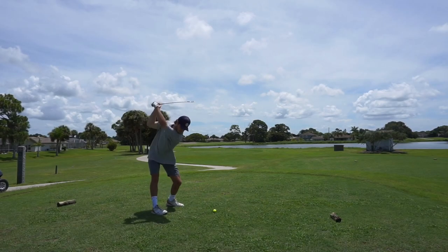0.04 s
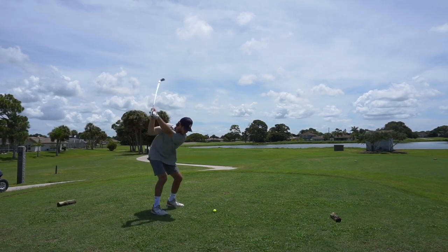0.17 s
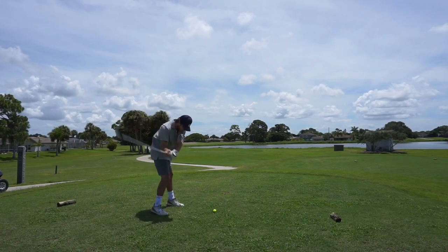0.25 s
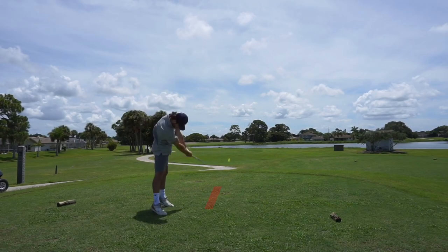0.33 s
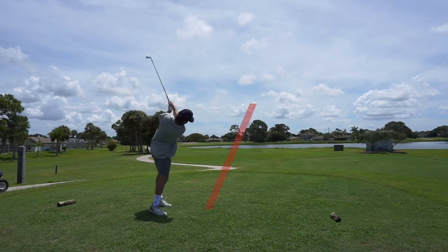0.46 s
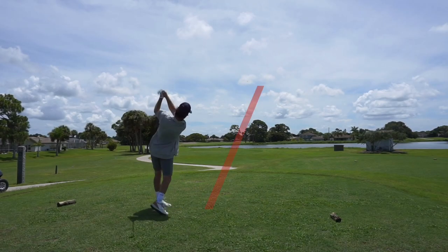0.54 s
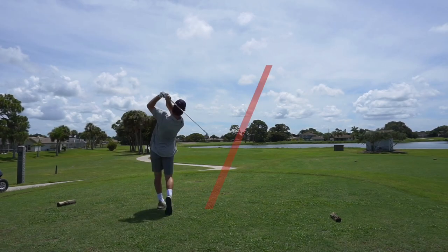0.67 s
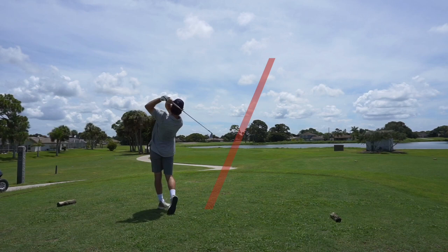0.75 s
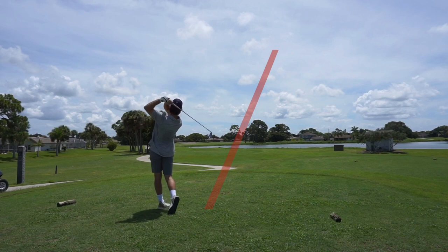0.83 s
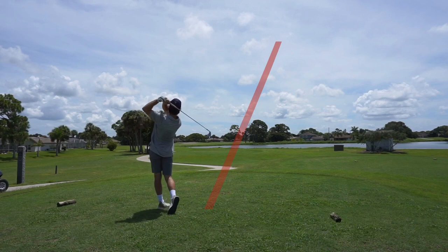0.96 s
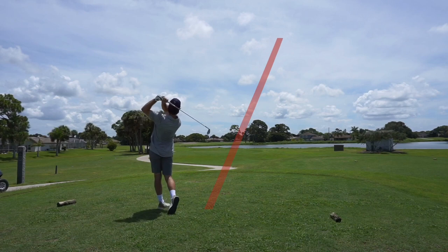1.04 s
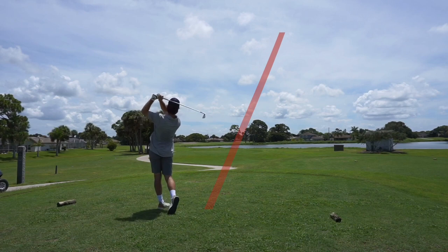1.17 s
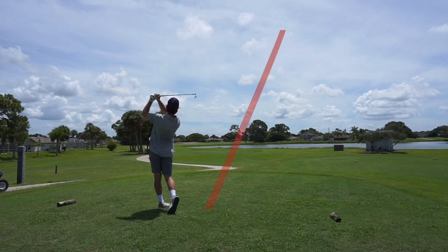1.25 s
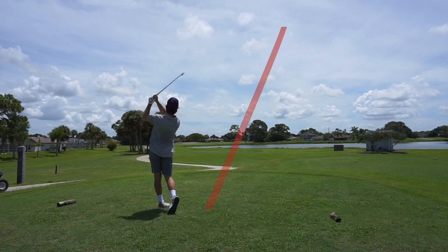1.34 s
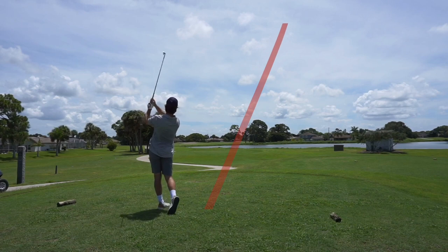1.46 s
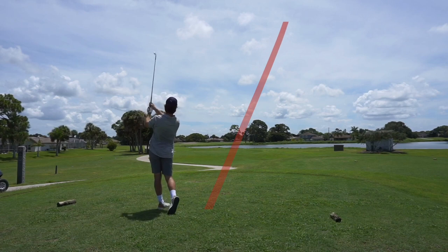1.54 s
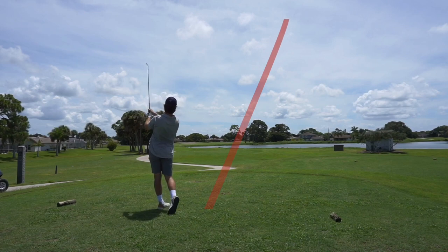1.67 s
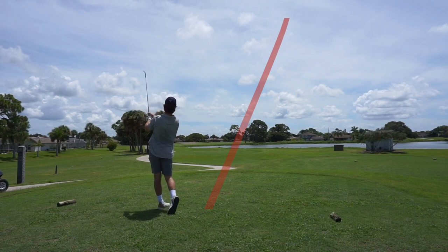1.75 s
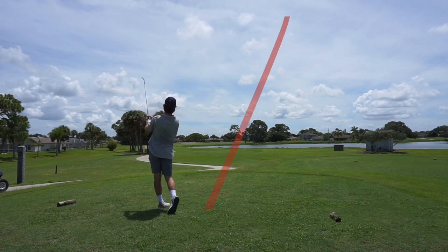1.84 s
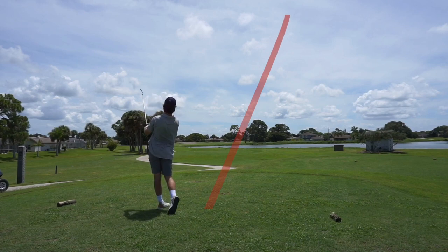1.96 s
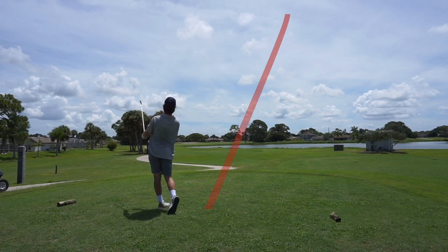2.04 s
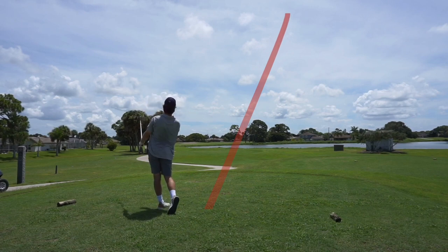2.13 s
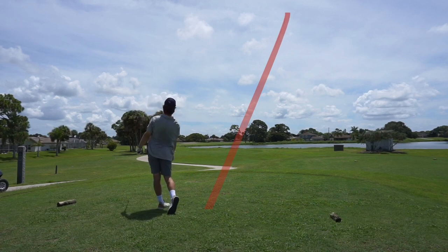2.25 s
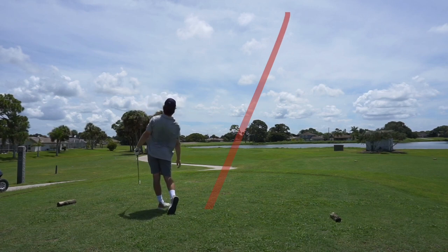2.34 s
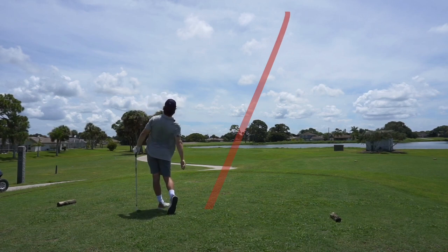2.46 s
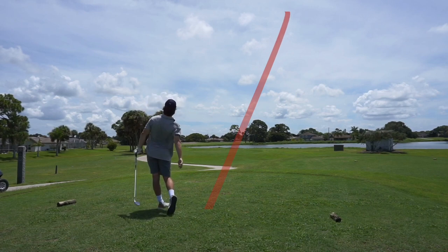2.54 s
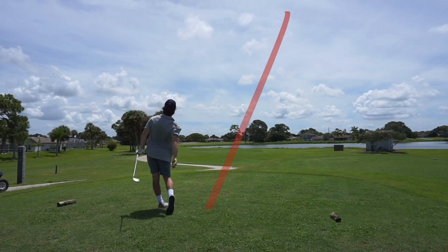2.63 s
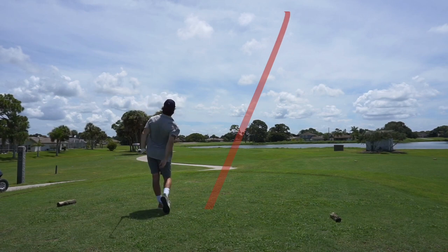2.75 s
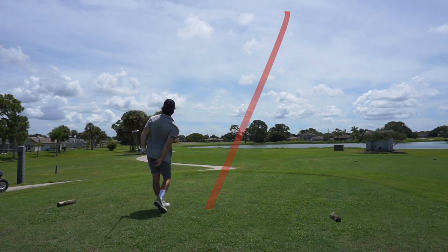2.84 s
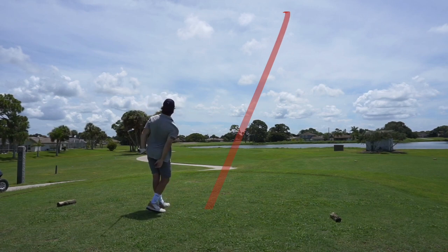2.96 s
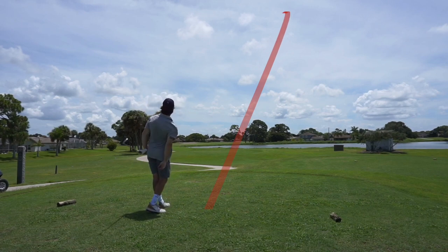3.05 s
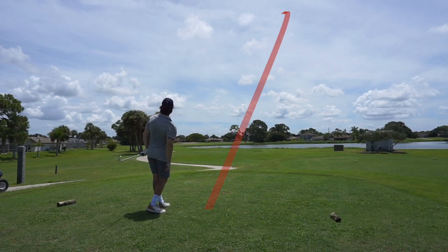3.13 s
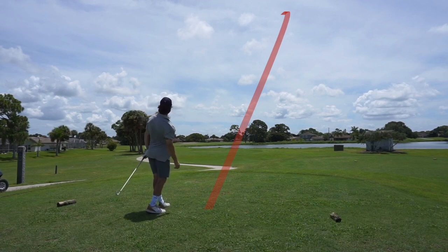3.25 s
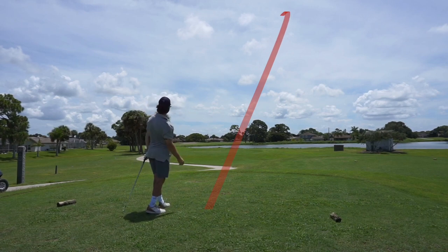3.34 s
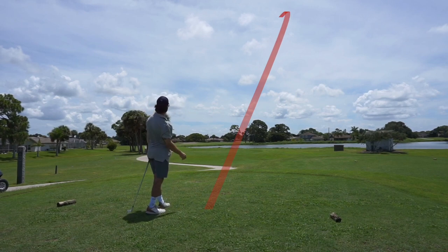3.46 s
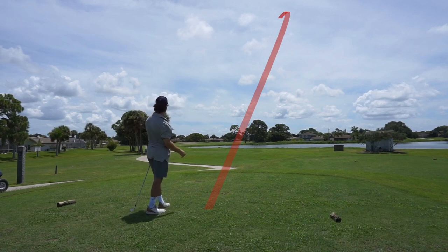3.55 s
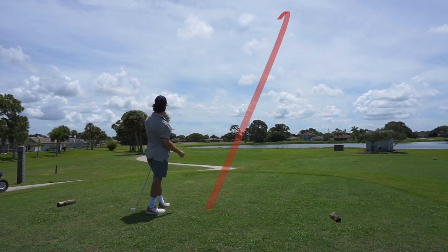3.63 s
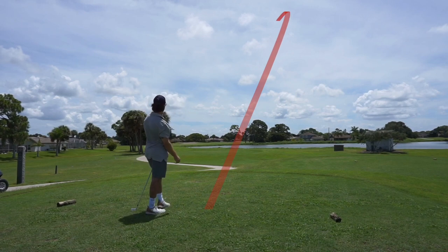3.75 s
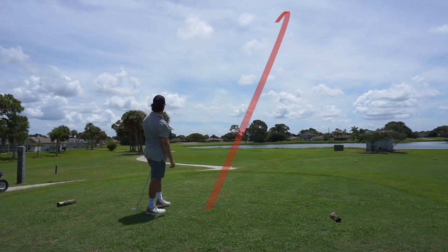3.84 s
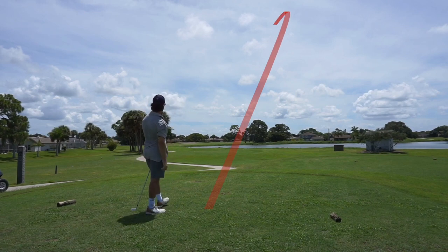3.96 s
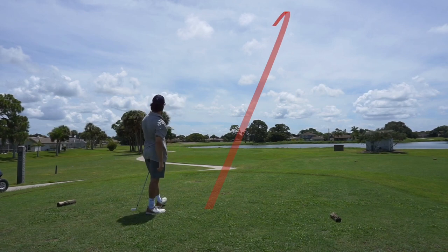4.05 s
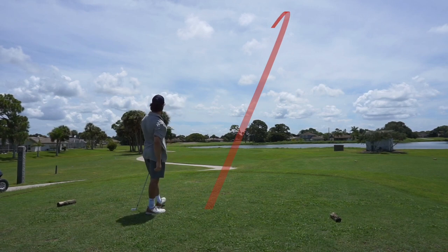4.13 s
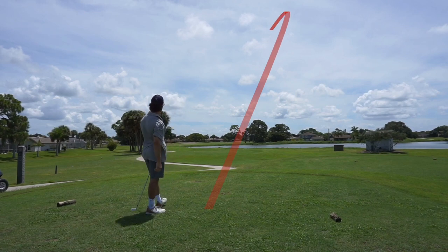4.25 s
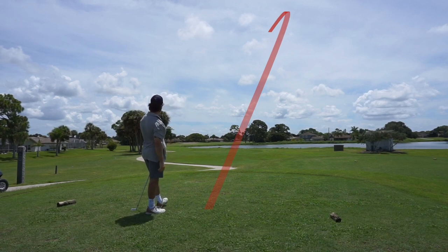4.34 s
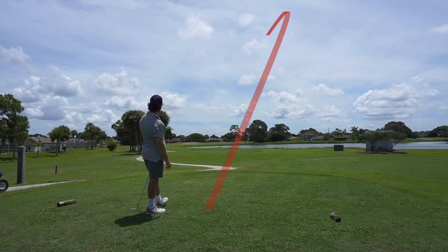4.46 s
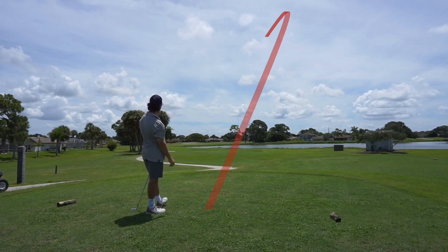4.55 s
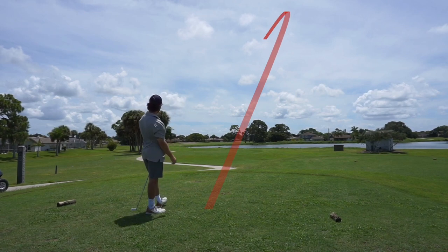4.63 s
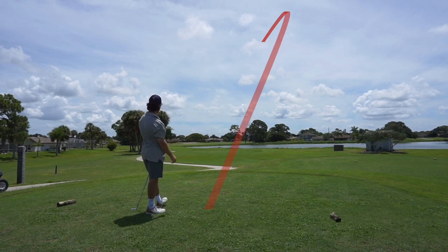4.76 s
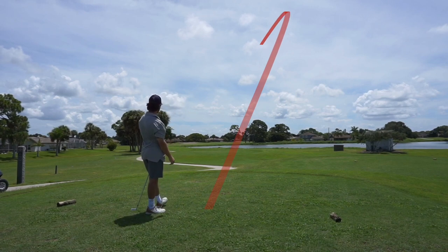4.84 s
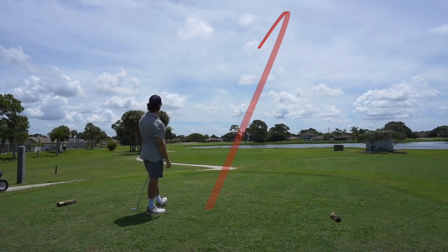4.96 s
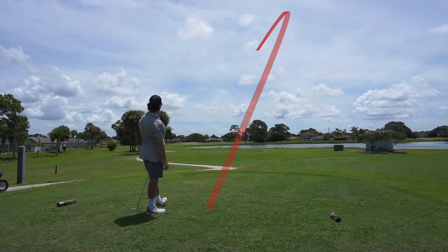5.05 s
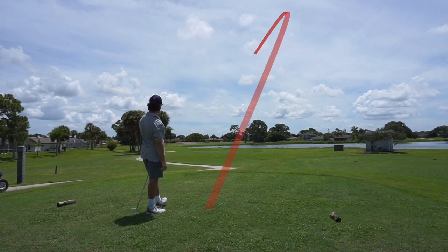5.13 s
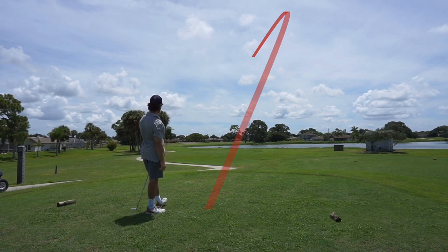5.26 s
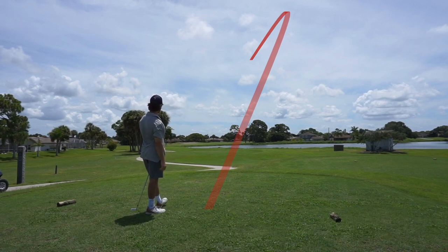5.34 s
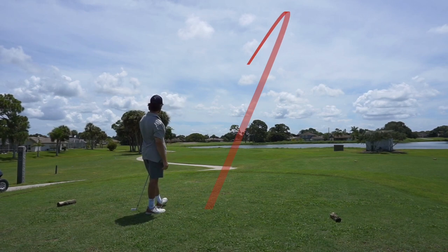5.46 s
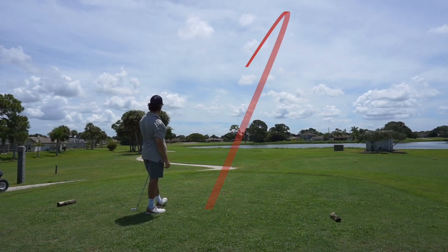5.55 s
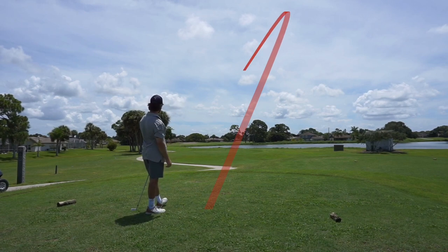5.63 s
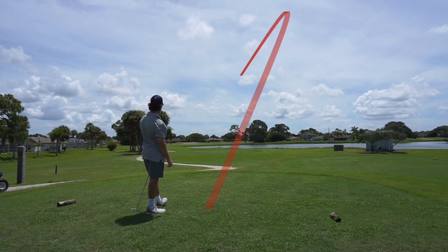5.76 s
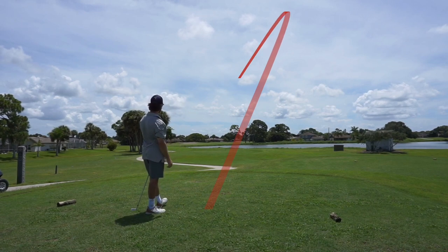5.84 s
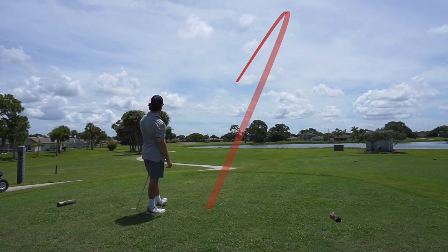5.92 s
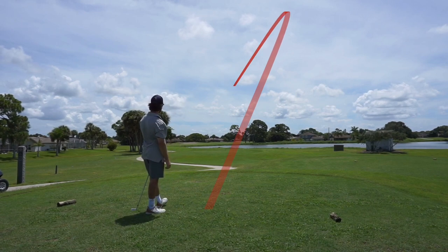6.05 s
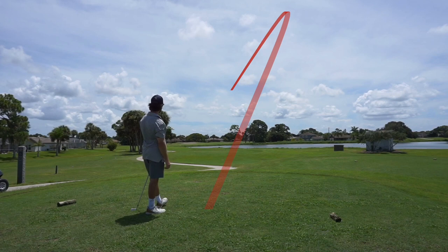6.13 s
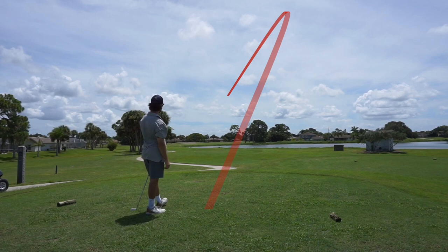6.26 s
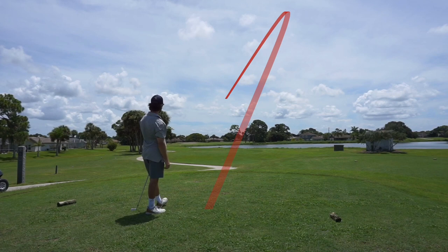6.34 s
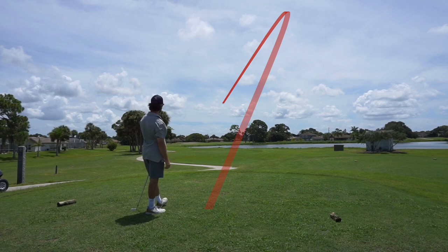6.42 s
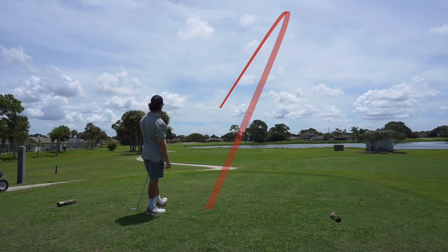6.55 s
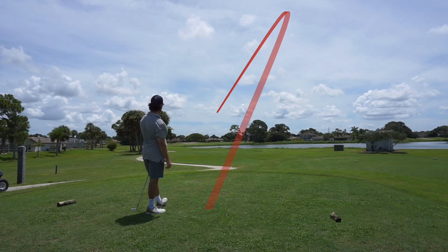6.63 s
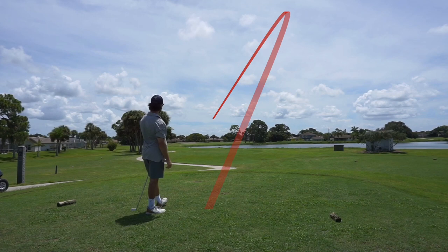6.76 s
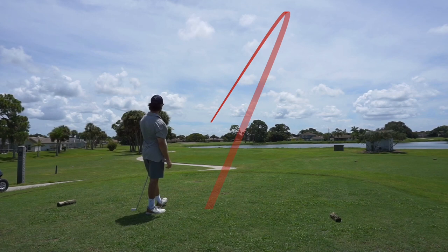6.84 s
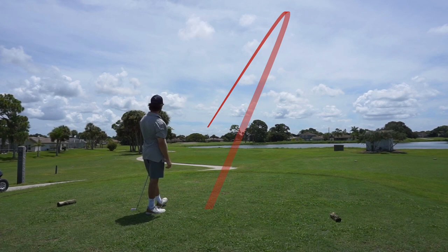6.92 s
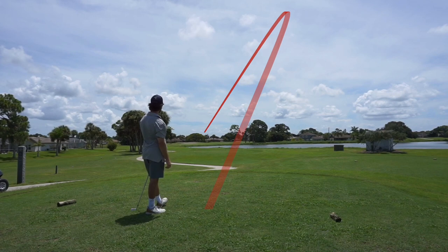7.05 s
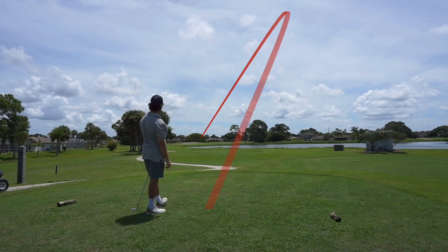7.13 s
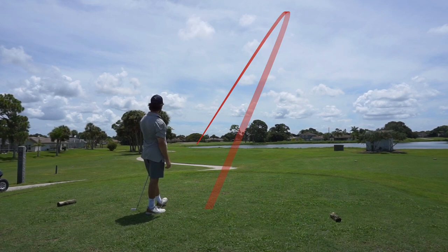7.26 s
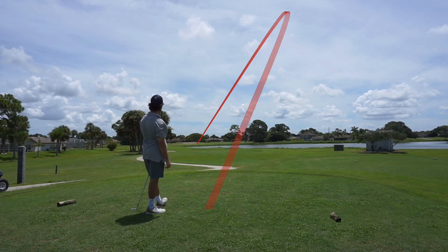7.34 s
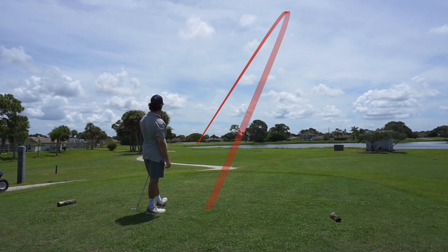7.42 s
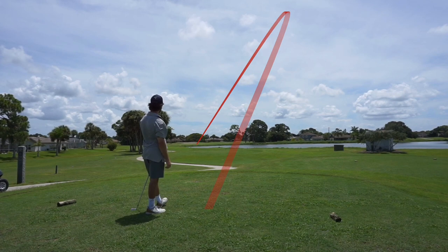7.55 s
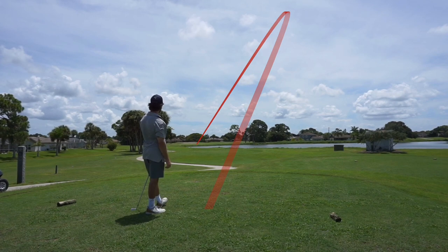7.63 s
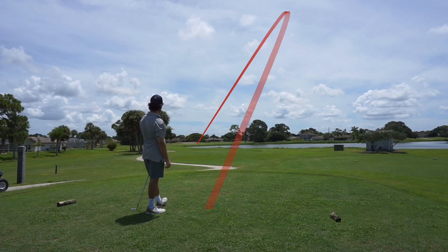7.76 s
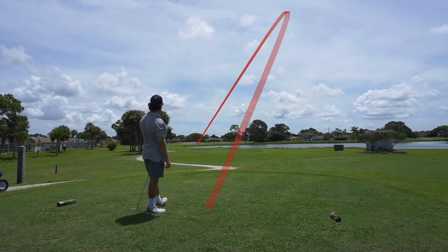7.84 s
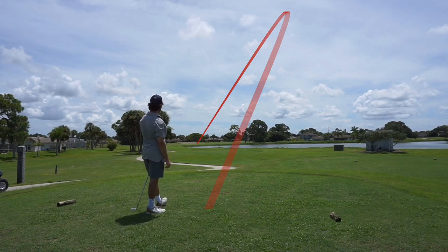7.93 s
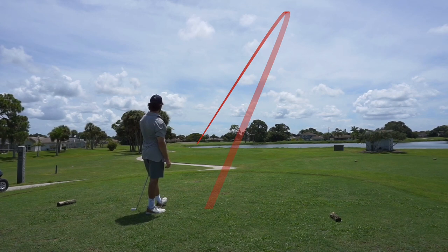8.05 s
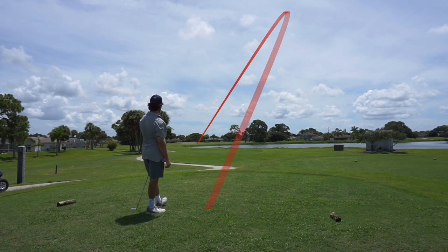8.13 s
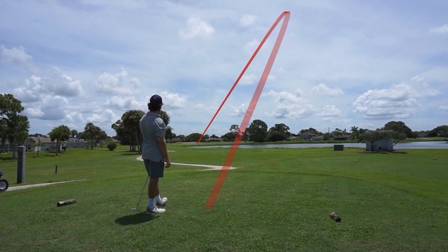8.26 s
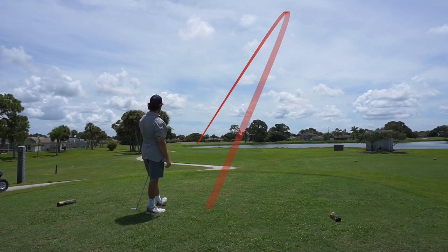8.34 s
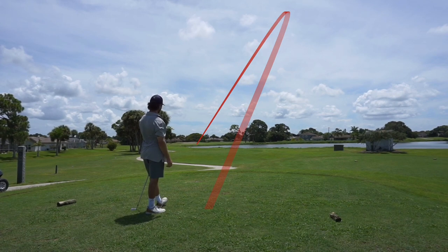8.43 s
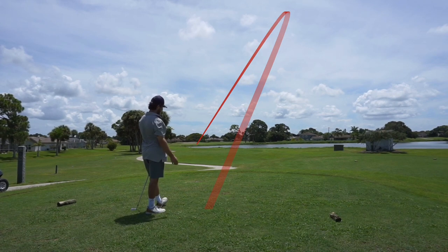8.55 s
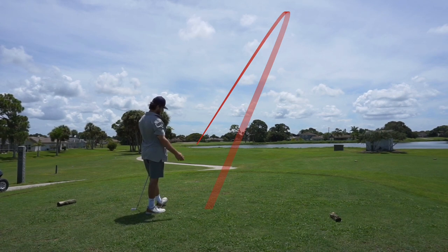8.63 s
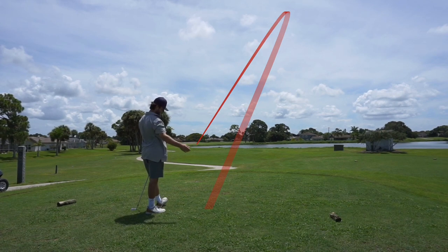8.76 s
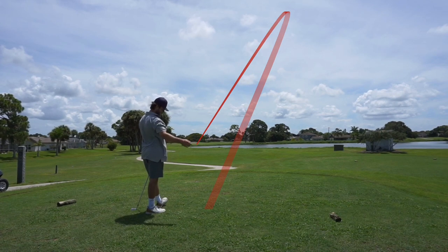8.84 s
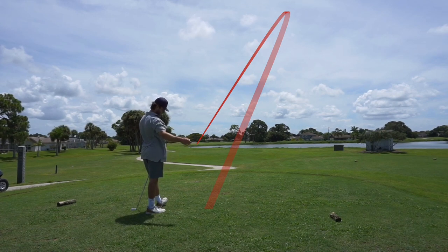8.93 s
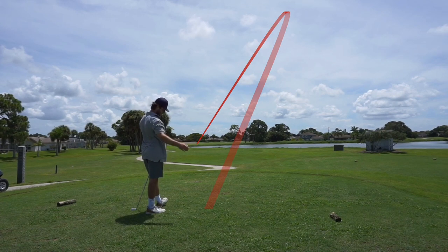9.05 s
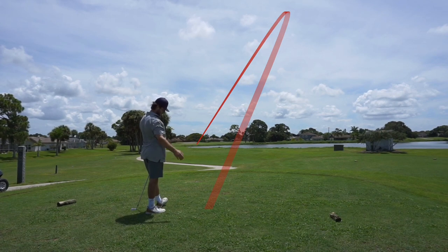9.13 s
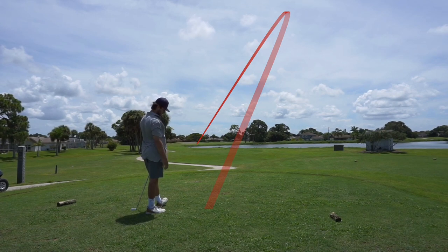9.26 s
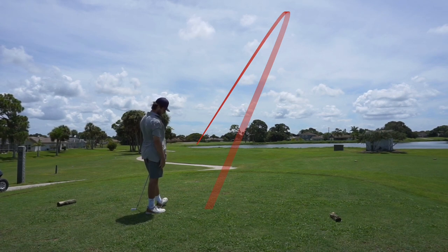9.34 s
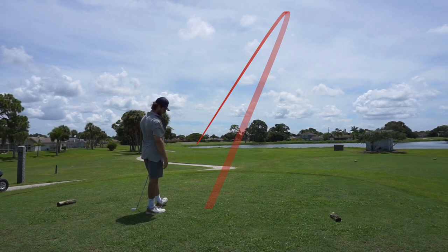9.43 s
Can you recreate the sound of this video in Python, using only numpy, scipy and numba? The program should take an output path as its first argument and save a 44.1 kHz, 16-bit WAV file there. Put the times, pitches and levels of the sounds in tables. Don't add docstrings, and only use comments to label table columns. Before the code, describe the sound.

Open, breezy golf course, microphone some metres from the player, dry with hardly any echo. From 0.1 s a narrow airy swish rises quickly, and at about 0.25 s an iron hits the ball: one extremely short, hard, bright crack with a tiny metallic ring, by far the loudest event. The background dips for a moment and returns. Throughout, wind presses on the microphone in low, irregular rumbles and thumps, stronger near 1.1, 2, 7 and 9.4 s. High rasping cicadas pulse in swells, peaking around 3.7 and 5.5 s. Distant tyre hum gradually fades, with very faint motor whines. A far sprinkler ticks about ten times a second at 2.2-3.7, 5.5-7 and from 8.9 s, with faint faster returns at 1.3, 4.6 and 7 s. Dull turf taps land at 2.6 and 3.05 s, fainter ones elsewhere. At 9.2 s a softer, woody-clicking distant strike sounds.

```python
import sys
import numpy as np
from scipy import signal
from scipy.fft import rfft, irfft, next_fast_len
from scipy.io import wavfile
from scipy.ndimage import uniform_filter1d, map_coordinates
from numba import njit

SR = 44100
rng = np.random.default_rng(int(sys.argv[2]) if len(sys.argv) > 2 else 0)


def field_ratio(decibels):
    return 10 ** (np.asarray(decibels, dtype=float) / 20)


def unload_audio(sound):
    columns = np.transpose(np.atleast_2d(sound))
    steps = np.round(np.clip(columns, -1, 1) * 32767)
    wavfile.write(sys.argv[1], SR, steps.astype(np.int16))


N = 418509
T = np.arange(N) / SR
STRIKE_S = .24475

# time in seconds, strength in dB, lean to small eddies in dB.
BREEZE = [(0.0, -26.91, 0.7), (0.55, -32.3, 0.95), (1.1, -23.81, -0.65), (1.5, -29.66, 0.32),
          (1.95, -21.09, -1.66), (2.3, -28.03, 0.47), (2.7, -33.24, 5.41), (3.3, -37.26, -0.09),
          (3.6, -32.42, 0.81), (4.1, -30.59, 5.51), (4.7, -34.57, 4.09), (5.4, -30.28, -0.17),
          (6.1, -29.93, 0.01), (6.95, -23.59, 0.46), (7.7, -25.66, 4.07), (8.2, -26.23, 2.47),
          (8.7, -30.18, 2.05), (9.49, -24.08, -1.15)]
# centre in seconds, swell in dB, length in seconds, smallness in dB.
EDDIES = [(0.195, 5.1, 0.075, 1.7), (0.434, 4.8, 0.076, -7.5), (0.654, 8.3, 0.057, 4.4),
          (1.008, 5.3, 0.2, 3.0), (1.4, 6.5, 0.054, 9.0), (1.671, 5.7, 0.067, -5.2),
          (2.132, 4.6, 0.19, 1.4), (2.816, 7.0, 0.11, -12.5), (3.086, 9.6, 0.08, -5.9),
          (3.487, 5.6, 0.18, -3.8), (3.886, 10.3, 0.051, 12.3), (4.008, 8.3, 0.2, -9.7),
          (4.197, 7.8, 0.055, -1.9), (4.476, 10.5, 0.14, -6.7), (4.749, 4.4, 0.068, -7.5),
          (4.859, 4.1, 0.059, 7.9), (5.286, 3.9, 0.07, -12.9), (5.48, 7.3, 0.13, -4.7),
          (6.358, 10.6, 0.14, 9.2), (6.695, 5.6, 0.058, 8.0), (6.799, 6.7, 0.086, -8.8),
          (7.318, 7.6, 0.092, -2.4), (7.443, 6, 0.062, -2.1), (8.022, 6.3, 0.053, 7.7),
          (8.143, 6.3, 0.047, -5.6), (8.386, 6.3, 0.089, -5.0), (8.942, 8.4, 0.07, -2.3),
          (9.089, 3.4, 0.077, 2.1), (9.294, 4.7, 0.05, 4.9), (9.429, 0.7, 0.07, 4.6)]
# frequency in Hz, level in dB per Hz.
WIND_SPECTRUM = [(7.1, -34), (12, -6), (38, 1), (60, 0), (134, -13.5), (194, -23.5), (420, -39.5),
                 (550, -66), (920, -120)]
# frequency in Hz, level in dB per Hz.
ROAD_SPECTRUM = [(150, -32), (250, 5.5), (276, -11.5), (304, 0.5), (330, -9.5), (502, -9), (731, -9.5),
                 (902, -8.5), (1640, -18), (2950, -13.5), (4120, -19.5), (6090, -21), (7000, -19.5),
                 (9100, -57), (15400, -120)]
# start in seconds, end in seconds, pitch in Hz, level in dB.
MOTOR_WHINES = [
    (.4, 2.0, 797, -66),
    (2.0, 3.9, 799, -59),
    (.6, 2.1, 883, -59),
    (3.6, 4.6, 890, -60),
    (5.1, 6.7, 923, -59),
    (2.2, 6.2, 307, -56),
    (2.2, 6.0, 228, -57),
]
# peak in seconds, swell in dB, rise in seconds,
# ripple of the ground bounce in dB.
PHRASES = [(.22, 3, .2, 1.4), (.66, 4.5, 0.27, 0), (1.2, 3.5, .3, 1.4), (1.55, 2, .2, .6),
           (2.03, 4, 0.31, 1.6), (2.2, -1.5, .08, .5), (2.62, 4.5, .3, 1.3), (2.89, 4.5, 0.13, 1.3),
           (3.4, 1, 0.24, 1.2), (3.7, 7.5, .11, .8), (4.07, -3.5, 0.15, .8), (4.35, 4.5, .13, 0),
           (4.93, 5, .22, 0), (5.3, 2, 0.22, 1.2), (5.53, 7, .1, .8), (5.9, 2.5, 0.23, .8),
           (6.6, 4, .3, -1), (7.0, 2, .3, .3), (7.6, 4.5, .3, 1.2), (7.72, -3, .03, 0), (8.3, 2, .4, .3),
           (8.9, 3, .4, 2.8), (9.12, 2.5, .15, 1)]
# frequency in Hz, level in dB per Hz.
CHORUS_SPECTRUM = [(4500, -40), (6300, -29), (7200, -14), (8000, -3), (8800, 2), (9600, -2.5), (10400, -5),
                   (11500, -8), (12300, -13.5), (13300, -14.5), (14500, -21), (15800, -22.5)]
# frequency in Hz, level in dB per Hz.
NEAR_SPECTRUM = [(5000, -39), (6400, -19.5), (7300, -8), (8100, 4), (9000, -1.5), (10500, -4), (12000, -13),
                 (13500, -27), (15800, -41)]
# first tick in seconds, gap in seconds, number of ticks,
# level in dB, share of the sweep where loudest.
SPRINKLER_SWEEPS = [
    (.0353, .0963, 2, -46, 0),
    (2.1525, .0961, 17, -46, .35),
    (5.5226, .0955, 16, -50, .7),
    (8.9346, .0954, 6, -50, .5),
]
# first tick in seconds, gap in seconds, number of ticks, level in dB.
SPRINKLER_RETURNS = [
    (1.342, .0428, 21, -53.5),
    (4.603, .0428, 17, -61),
    (7.05, .043, 16, -56),
]
# frequency in Hz, level in dB, 60 dB decay in seconds.
ARM_MODES = [(4680, -2, 0.014), (6850, 1.5, 0.0095), (5800, -4, 0.0093)]
# start in seconds, peak in dB, pitch in Hz, 60 dB decay in seconds, edge in dB.
TURF_TAPS = [
    (0.699, -39, 899, 0.012, -14),
    (0.993, -37, 579, 0.014, -17),
    (2.636, -29, 550, 0.0085, -23),
    (3.05, -28.5, 560, 0.012, -7),
    (4.178, -39.5, 570, 0.014, -12),
    (6.503, -39, 493, 0.012, -14),
    (3.9664, -50, 3120, 0.013, -15),
    (4.6024, -43.5, 3760, 0.015, -15),
    (5.2455, -47, 3040, 0.014, -15),
    (5.7483, -49, 3400, 0.015, -15),
]
# start in seconds, level in dB, frequency in Hz, 60 dB decay in seconds.
FAR_STRIKE = [(9.218, -44, 2000, .01), (9.2275, -32, 3000, 0.0032), (9.2295, -30, 728, 0.039),
              (9.2315, -36, 1200, 0.029), (9.2358, -25.5, 2770, 0.015), (9.2352, -38, 1900, 0.0057),
              (9.2355, -40, 4600, .007), (9.2355, -24.5, 690, 0.022), (9.2357, -30.5, 3800, 0.013),
              (9.2355, -41, 6000, 0.0046), (9.2348, -40, 5220, 0.0046), (9.2353, -30, 1620, 0.0081)]
# time in seconds, whoosh in dB, eddy pitch in Hz, hiss in dB above the whoosh.
DOWNSWING = [
    (.11, -54, 350, -6),
    (.14, -42, 390, -10),
    (.165, -33, 470, -14),
    (.185, -25, 570, -15),
    (.205, -21, 660, -18),
    (.22, -25, 690, -15),
    (.232, -30, 590, -12),
    (.243, -28, 470, -13),
    (.46, -40, 290, -8),
]
# frequency in Hz, level in dB, 60 dB decay in seconds.
HEAD_MODES = [(800, -12, .018), (1384, -12, .012), (2050, -18, .01), (2480, 5, .015), (2950, -2, .014),
              (3550, -4, .011), (3960, 0, .012), (4592, -3, .018), (5300, -6, .012), (6150, -8, .013),
              (7700, -10, .01), (9119, -16, .009)]
# delay in seconds, level in dB, spread in seconds.
REFLECTIONS = [
    (.0035, -19, .0004),
    (.0105, -39, .001),
    (.038, -53, .013),
    (.057, -55, .004),
]


def curves(table):
    s, *columns = np.transpose(table)
    return [np.interp(T, s, c) for c in columns]


def bumps(table, fall_s=None):
    s, _, length, _ = np.transpose(table)[:, :, None].astype(np.float32)
    late = T.astype(np.float32)[::32] - s
    return np.exp(-(late / np.where(late < 0, length, fall_s or length)) ** 2)


def stretch(slow):
    return np.interp(T, T[::32], slow)


def unit(x):
    return x / np.sqrt(np.mean(x ** 2))


def even(x, hold_s):
    return unit(x / np.sqrt(uniform_filter1d(x ** 2, int(hold_s * SR)) + .05))


def colour(x, points, lo_hz=0, hi_hz=SR):
    size = next_fast_len(N, True)
    hz = np.fft.rfftfreq(size, 1 / SR) + 1
    f, db = np.transpose(points)
    edges = 1 / np.sqrt((1 + (lo_hz / hz) ** 10) * (1 + (hz / hi_hz) ** 10))
    gain = field_ratio(np.interp(np.log(hz), np.log(f), db)) * edges
    return unit(irfft(rfft(x, size) * gain, size)[:N])


def walk(rate):
    k = int(SR / rate)
    held = np.repeat(rng.standard_normal(N // k + 1), k)
    return unit(uniform_filter1d(uniform_filter1d(held, k), k)[:N])


def add(out, s, db, hz, t60, rough=0):
    t = np.arange(int(.06 * SR)) / SR
    grit = 4 * np.convolve(rng.standard_normal(len(t)), np.hanning(24) / 12, "same")
    envelope = field_ratio(db - 60 * t / t60) * np.tanh(t / .0001)
    ring = envelope * np.sin(2 * np.pi * hz * t) * (1 + rough * grit)
    i = int(s * SR)
    out[i:i + len(t)] += ring[:N - i]


@njit
def svf(x, hz, sharp):
    y, b, l = np.empty(len(x)), 0., 0.
    for i in range(len(x)):
        g = np.tan(np.pi * hz[i] / SR)
        v = (b + g * (x[i] - l)) / (1 + g * (g + 1 / sharp))
        b, l, y[i] = 2 * v - b, l + 2 * g * v, v / sharp
    return y


@njit
def duck(x, heard, top, attack, release):
    y, e = np.empty(len(x)), 0.
    for i in range(len(x)):
        y[i] = x[i] * min(1., top / (e + 1e-9))
        e += (abs(heard[i]) - e) * (attack if abs(heard[i]) > e else release)
    return y


def wind():
    breeze_db, lean_db = curves(BREEZE)
    passing = bumps([(s, db, length * 0.54, small) for s, db, length, small in EDDIES])
    _, swells, _, smallness = np.transpose(EDDIES)
    swell_db, small_db = stretch(swells @ passing), stretch(smallness @ passing)
    big_db = swell_db - np.maximum(small_db, 0)
    buffet_db = -4 + .6 * lean_db + big_db + small_db
    flutter_db = -14.5 + lean_db + 0.71 * big_db + 0.35 * small_db
    burst = walk(14)
    out = np.zeros(N)
    for lo, hi, db, burst_db in [(0, 58, big_db, 1.8), (60.5, 139, buffet_db, 2.6), (139.5, 464, flutter_db, 2.2)]:
        noise = even(colour(rng.standard_normal(N), WIND_SPECTRUM, lo, hi), .22)
        out += field_ratio(breeze_db + 2 + db + burst_db * burst) * noise
    for s, db, _, small in EDDIES:
        i = int(s * SR)
        thump_s = max(.006 - .00025 * small, .002)
        x = np.arange(-2000, 2000) / SR / thump_s
        out[i - 2000:i + 2000] += field_ratio(breeze_db[i] - 4 + 2 * db) * (1 - x ** 2) * np.exp(-x ** 2 / 2)
    return out


def road():
    leaving_db = 3 * np.exp(-T / 0.67)
    passing_db = 1.2 * np.exp(-((T - 4.3) / .5) ** 2)
    car_db = leaving_db + passing_db - .4
    hum_db = -47.5 + car_db - 0.225 * T + 0.69 * walk(9)
    hiss_db = -53.5 + car_db - 0.56 * T + 0.67 * walk(12)
    out = field_ratio(hum_db) * colour(rng.standard_normal(N), ROAD_SPECTRUM, 285, 1705)
    out += field_ratio(hiss_db) * colour(rng.standard_normal(N), ROAD_SPECTRUM, 1490, 6950)
    for start, end, hz, db in MOTOR_WHINES:
        fade = np.clip(np.minimum(T - start, end - T) / 0.3, 0, 1)
        phase = 2 * np.pi * np.cumsum(hz * (1 + .006 * walk(5))) / SR
        out += fade * field_ratio(db + 1 + 2.0 * walk(6)) * np.sin(phase)
    return out


def singer(song, rate, clicks, gap, skipped, fade_db, jitter, drift, scatter_db, top_hz):
    chance = rng.standard_normal((1200, 10))
    start = (np.cumsum(1 + drift * chance[:, 9]) + jitter * chance[:, 0]) / rate + .005
    sounded = rng.random(len(chance)) > skipped
    pulses = np.zeros(2 * N)
    for k in range(clicks):
        at = start + gap * (k + .12 * chance[:, 1 + k])
        np.add.at(pulses, (at * SR).astype(int), sounded * field_ratio(fade_db * k + scatter_db * chance[:, 5 + k]))
    return colour(pulses[:N], song, 5000, top_hz)


def cicadas():
    phrase = bumps(PHRASES, 0.072)
    _, swells, _, ripples = np.transpose(PHRASES)
    swell_db = stretch(swells @ phrase)
    ripple_db = .35 + stretch(ripples @ phrase)
    chorus_db = -48 + 0.26 * T + swell_db - 40 * np.maximum(T - 9.4, 0)
    share = np.clip(field_ratio(-6 + 0.96 * swell_db - 2.5 * (ripple_db - .7)), 0, .8)
    near = singer(NEAR_SPECTRUM, rate=87.6, clicks=4, gap=.00145, skipped=.28, fade_db=0,
                  jitter=.07, drift=.05, scatter_db=-0.5, top_hz=15000)
    steady = singer(CHORUS_SPECTRUM, rate=102.8, clicks=3, gap=.00324, skipped=.02, fade_db=-6,
                    jitter=.02, drift=.004, scatter_db=1.5, top_hz=12500)
    far = field_ratio(0.55 * walk(30)) * colour(rng.standard_normal(N), CHORUS_SPECTRUM, 5400)
    trees = unit(far + field_ratio(-2) * steady)
    lag_ms = .703 + .003 * walk(2.5) - .002 * swell_db
    bounce = np.clip(.36 * ripple_db, 0, .9)
    delayed = map_coordinates(trees, [np.arange(N) - lag_ms * SR / 1000], order=3)
    trees = (trees + bounce * delayed) / np.sqrt(1 + bounce ** 2)
    trees = trees + .3 * (ripple_db - 1.2) * svf(trees, np.full(N, 11000.), 3.0)
    return field_ratio(chorus_db) * (share * near + np.sqrt(1 - share ** 2) * trees)


def sprinkler():
    out = np.zeros(N)
    ticks = []
    for s, gap, count, db, loudest in SPRINKLER_SWEEPS:
        for k in range(int(count)):
            turned_db = -16 * (k / count - loudest) ** 2
            ticks.append((s + gap * k, db + turned_db + 1.5 * rng.standard_normal()))
    for s, gap, count, db in SPRINKLER_RETURNS:
        for k in range(int(count)):
            ticks.append((s + gap * k, db + 2 * rng.standard_normal()))
    for s, db in ticks:
        for hz, mode_db, t60 in ARM_MODES:
            add(out, s, db + mode_db + 3.5, hz, t60, rough=.3)
    return out


def turf_taps():
    out = np.zeros(N)
    for s, db, hz, t60, edge_db in TURF_TAPS:
        add(out, s + 0.0022, db + edge_db, 2.78 * hz, .012, rough=0.38)
        add(out, s + 0.00186, db + 8.0, hz, t60, rough=.1)
    return out


def far_strike():
    out = np.zeros(N)
    for s, db, hz, t60 in FAR_STRIKE:
        add(out, s, db, hz, t60, rough=0.64)
    return out


def swing():
    whoosh_db, hz, hiss_db = curves(DOWNSWING)
    start_s, end_s = DOWNSWING[0][0], DOWNSWING[-1][0]
    rise = np.clip((T - start_s) / 0.051, 0, 1)
    follow_through = np.clip((STRIKE_S + 0.0045 - T) / 0.0043, field_ratio(-13), 1)
    moving = rise * follow_through * (T < end_s)
    eddies = unit(svf(svf(rng.standard_normal(N), hz, 4.2), hz, 2.2))
    hiss_spectrum = [(900, -20), (1200, 2.5), (3500, -3), (7000, -11), (12000, -31)]  # Hz, dB per Hz
    hiss = colour(rng.standard_normal(N), hiss_spectrum)
    return moving * field_ratio(whoosh_db) * (eddies + field_ratio(hiss_db) * hiss)


def strike():
    squash_s, rebound_s, leave_s = .0003, .00052, .00007
    t = T - STRIKE_S - .00005
    out = 1.55 * np.sin(np.pi * np.clip(t / squash_s, 0, 1) ** .75)
    rebound_times = [0, 2 * leave_s, rebound_s - 2 * leave_s, rebound_s, rebound_s + leave_s]
    out += np.interp(t - squash_s, rebound_times, [0, -.8, -.8, -2.1, 0])
    add(out, STRIKE_S, -17, 8600, .005, rough=.6)
    add(out, STRIKE_S + .0003, -32, 14500, .006, rough=.6)
    add(out, STRIKE_S + .0002, -24, 10800, .007, rough=.6)
    for hz, db, t60 in HEAD_MODES:
        add(out, STRIKE_S + .0003 + 1.6 / hz, db - 6, hz, t60, rough=.3)
    thin = signal.sosfilt(signal.butter(2, [3600, 15000], "band", fs=SR, output="sos"), out)
    for lag, db, spread in REFLECTIONS:
        scatter = rng.standard_normal(1024)[:max(int(spread * SR), 8)]
        out = out + field_ratio(db) * np.roll(signal.fftconvolve(thin, scatter)[:N], int(lag * SR))
    return out


def scene():
    background = wind() + road() + cicadas() + sprinkler()
    return (background + turf_taps() + far_strike() + swing() + strike())[None]


def roll_off(x):
    return signal.sosfilt(signal.butter(12, 16090, fs=SR, output="sos"), x)


def record(dry):
    heard = signal.sosfilt(signal.butter(2, 250, "high", fs=SR, output="sos"), dry[0])
    attack_s, release_s = .001, .075
    held = duck(dry[0], heard, .22, 1 / (attack_s * SR), 1 / (release_s * SR))
    rounded = 1.252 * np.tanh(held / 1.254)
    mix = signal.sosfilt(signal.ellip(8, .2, 60, 15900, fs=SR, output="sos"), rounded)[None]
    return roll_off(mix)


dry = scene()
out = record(dry)
unload_audio(out)
```